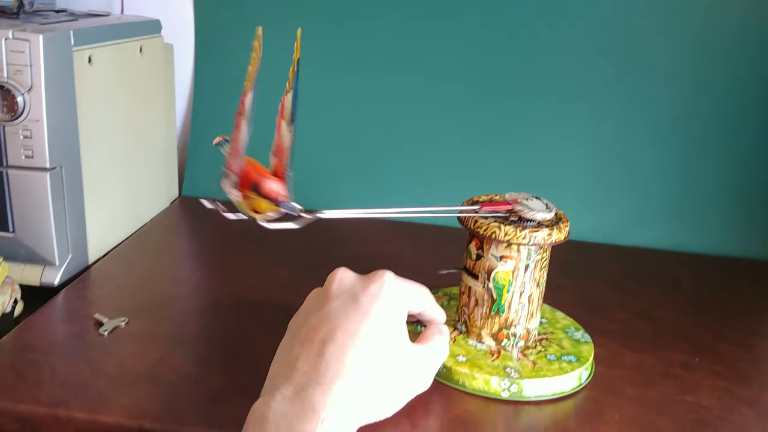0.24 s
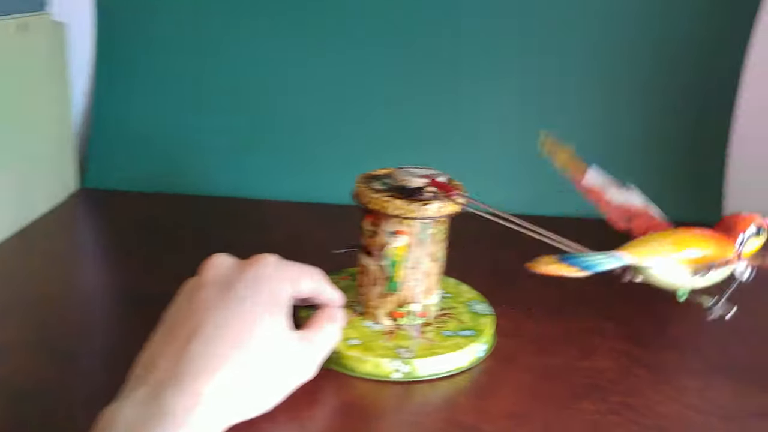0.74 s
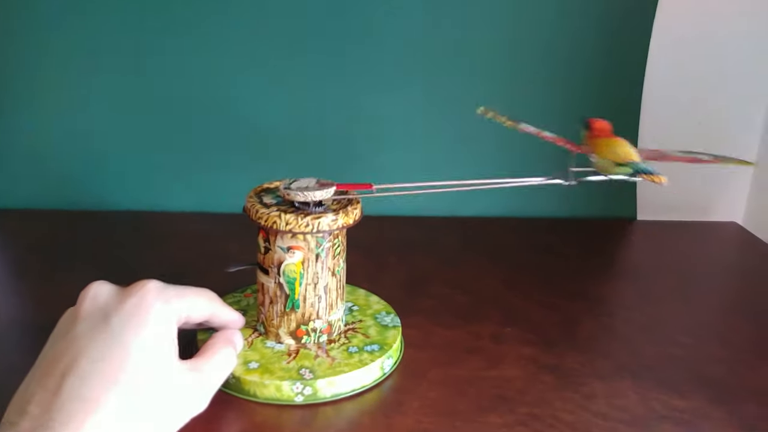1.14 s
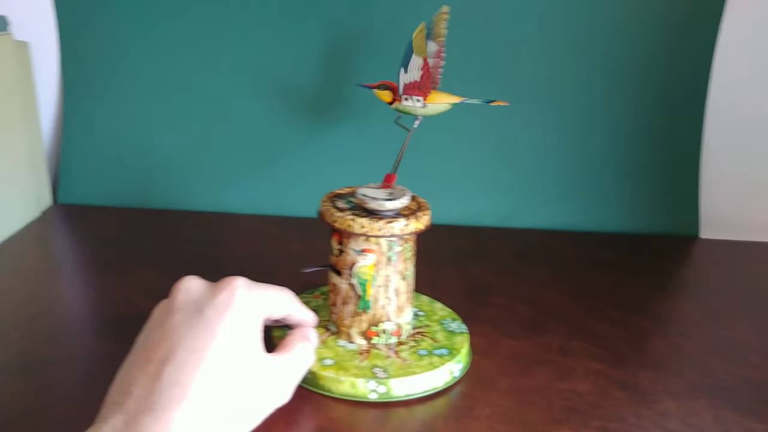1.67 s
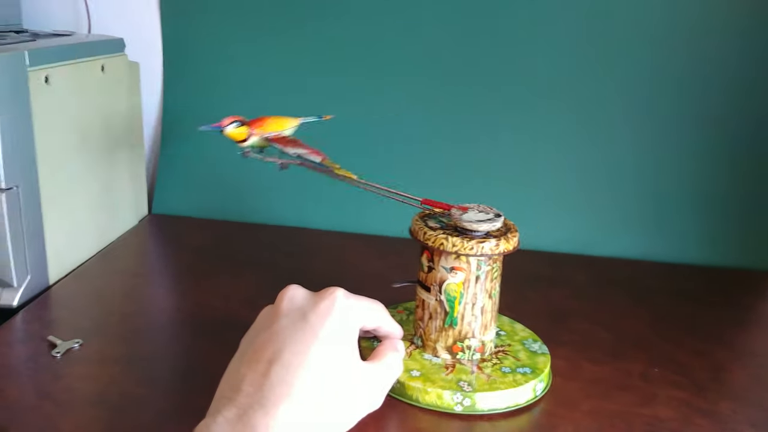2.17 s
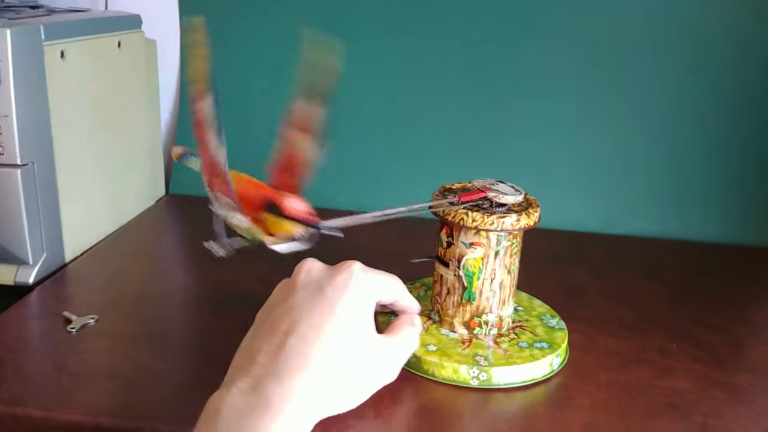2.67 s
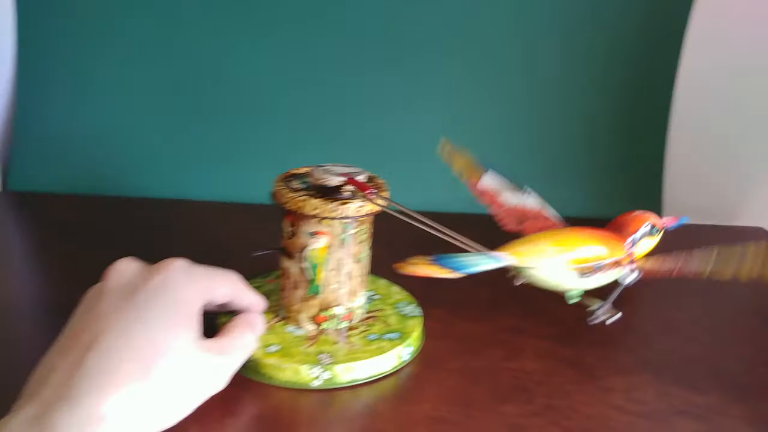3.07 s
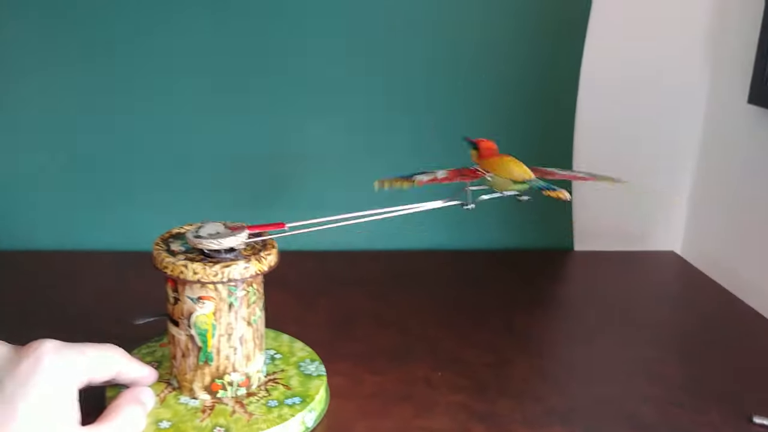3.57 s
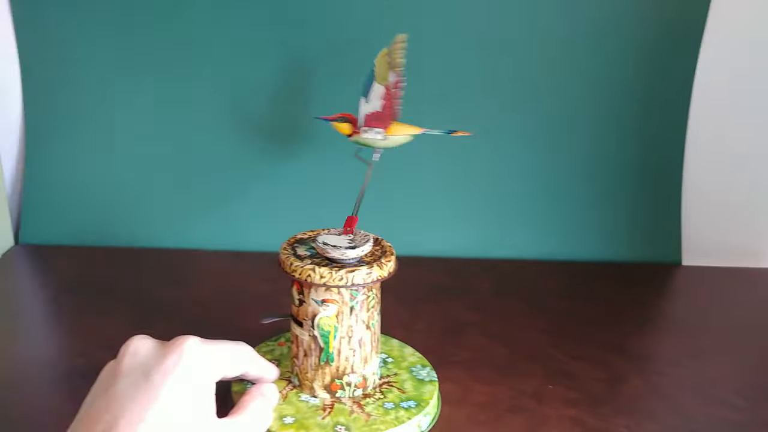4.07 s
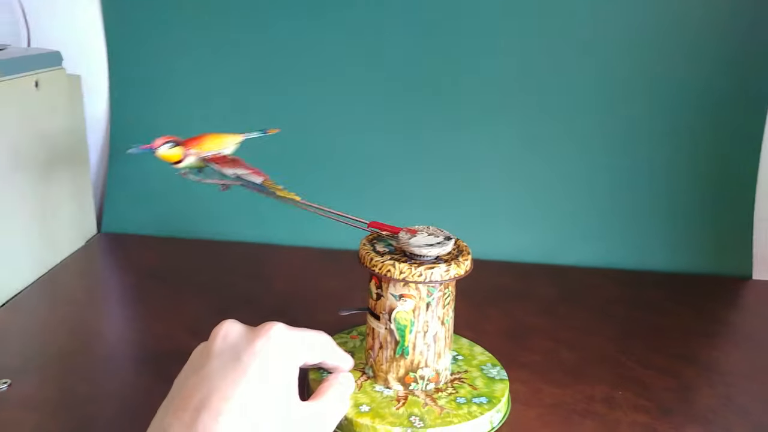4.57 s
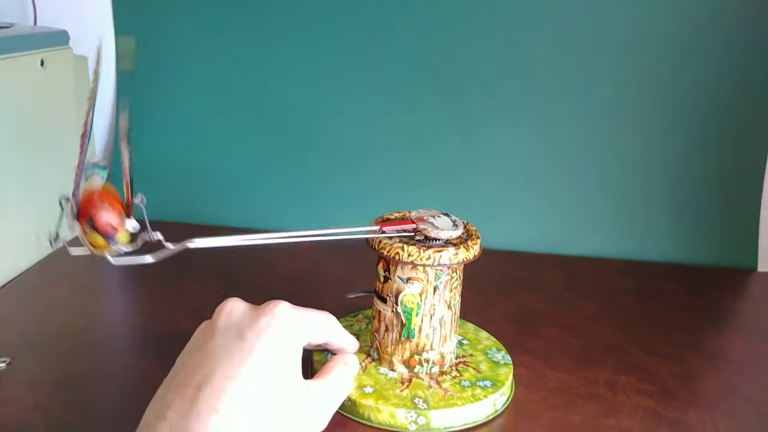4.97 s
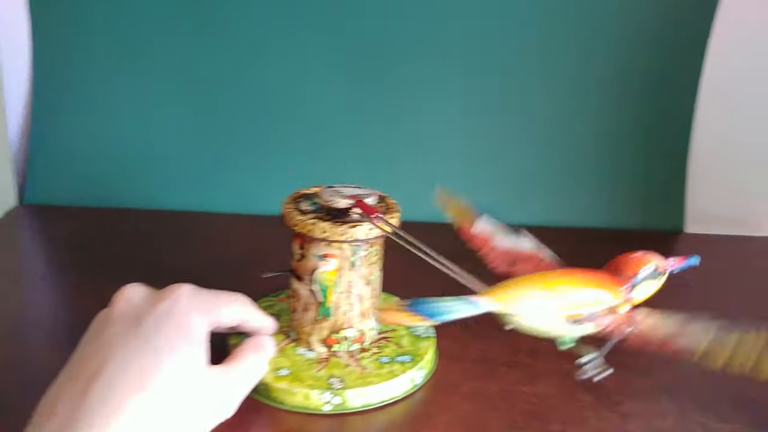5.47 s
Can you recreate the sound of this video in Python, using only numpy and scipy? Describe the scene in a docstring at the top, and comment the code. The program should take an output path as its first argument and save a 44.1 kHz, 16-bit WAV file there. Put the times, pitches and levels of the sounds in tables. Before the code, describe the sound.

High, tinny ticking runs without a break as a wind-up toy bird turns on its arm, heard up close in stereo on an indoor table. The rattle swells and dips rapidly, its colour changing with each circle. Hard little snaps, dull wing knocks and occasional wavering squeaks come through it. Beneath lie faint room hum and a soft drone that falls as the spring runs down.

```python
"""On a wooden table, close to a stereo camera, a clockwork tin bird circles its post on a long arm.
Its gears rattle in dense ticks that swell with every turn of an off-centre wheel. The ticks and the
knocks of the wings make the tin ring, and its tone shifts as the arm swings round. Now and then the
post sings a thin note. A soft drone, sinking as the spring runs down, and the room lie beneath."""
import sys
import numpy as np
from scipy import signal
from scipy.fft import rfft, irfft
from scipy.io import wavfile
from scipy.ndimage import uniform_filter1d

SR = 44100
rng = np.random.default_rng(int(sys.argv[2]) if len(sys.argv) > 2 else 0)


def generate_wav(sig):
    """Save sig (samples, or channels by samples) to the path in sys.argv[1] as 16-bit PCM at SR."""
    pcm = np.round(np.clip(np.atleast_2d(sig).T, -1, 1) * 32767).astype(np.int16)
    wavfile.write(sys.argv[1], SR, pcm)


N = 252693

# the pitches at which the tin rings: f/Hz, width/Hz, boost/dB
TIN_RINGS = [(583, 16.3, 8), (705, 61, 6.5), (791, 24, 3.5), (862, 123, 6.5), (959.5, 8.6, 10.5),
             (1177, 147, 6.5), (1335, 61, 10.5), (1537, 18, 9), (1945, 24, 5.5), (2010, 110, 0),
             (2176, 50, 7), (2375, 27, 9.5), (2454, 270, 3), (2684, 61, 5.5), (2770, 104, 3), (2935, 53, 2),
             (3047, 67, -5.5), (3293, 40, 3), (3630, 19, 4.5), (4720, 180, 4), (5240, 75, 5.5),
             (6400, 270, 4), (6900, 170, 3.5), (7450, 360, 5), (7930, 176, 4.5), (8990, 330, 5),
             (9440, 460, 8.5)]
# how far the camera body makes the right microphone lag: f/Hz, phase/rad
RIGHT_LAG = [(1500, .01), (3000, -0.052), (5000, -0.57), (6500, -0.56), (7500, -0.72), (10000, 0.47),
             (15000, 1.2)]


def amp(db):
    """Turns decibels into a factor to multiply by."""
    return 10 ** (np.asarray(db) / 20)


def unit_rms(x):
    """Scales a signal to an average strength (rms) of 1."""
    return x / np.sqrt(np.mean(x ** 2) + 1e-20)


def at_pitch(table, hz, column=1):
    """Looks up a table at any frequency, on a logarithmic scale."""
    columns = np.transpose(table)
    return np.interp(np.log(hz + 1), np.log(columns[0] + 1), columns[column])


def at_time(table, t):
    """Looks up a table at times t: one curve for each column after the first."""
    times, *columns = np.transpose(table)
    return [np.interp(t, times, column) for column in columns]


def bumps(centres, lengths, t):
    """Smooth bumps of height 1, one a row; each length is the width at half height."""
    centres, lengths = np.reshape([centres, lengths], (2, -1, 1))
    return np.exp(-4 * np.log(2) * ((t - centres) / np.maximum(lengths, 0.004)) ** 2)


def smooth(x, size):
    """Averages neighbouring values twice, leaving only the slower changes."""
    return uniform_filter1d(uniform_filter1d(x, size), size)


def fuzzy_tone(hz, width_hz):
    """Noise narrowed to a band around one pitch, which may glide."""
    spin = np.exp(2j * np.pi * np.cumsum(hz * np.ones(N)) / SR)
    decay = np.exp(-np.pi * width_hz / SR)
    slow_noise = signal.lfilter([1 - decay], [1, -decay], rng.standard_normal(N) / spin)
    return unit_rms((spin * slow_noise).real)


def stereo(a, b, hz, delay_s=0, pan_db=0):
    """Mixes two unrelated spectra into left and right: partly alike, unequal in level and timing."""
    # how alike the two sides are: f/Hz, likeness/0-1
    likeness = [(60, 0.8), (250, 0.82), (700, 0.62), (1300, 0.6), (2500, 0.35), (4500, .4), (7300, 0.5),
                (9000, 0.4), (13000, 0.26)]
    # how much louder the left side is: f/Hz, left minus right/dB
    balance = [(60, 6), (92, 7), (140, 2), (210, 6), (330, 1.5), (500, 4.5), (770, 4.5), (1170, 2),
               (1790, -0.5), (2740, 2.0), (4190, 5), (6410, 2), (9000, 4), (15000, 1)]
    alike = np.clip(at_pitch(likeness, hz), 0, 1)
    lean = amp((at_pitch(balance, hz) + pan_db) / 2)
    lag = np.exp(-1j * (2 * np.pi * hz * delay_s + at_pitch(RIGHT_LAG, hz)))
    right = alike * a + np.sqrt(1 - alike ** 2) * b
    return np.array([a * lean, right * lag / lean])


def tooth_pressure():
    """How hard the gear teeth meet: the off-centre wheel presses them together once a turn."""
    # the wheel at every third turn: t/s, mean pressure/dB, swell/dB
    wheel = [(-.037, -29.5, -2), (0.191, -30, 5), (.37, -23, 0), (0.537, -25, 2.5), (.715, -26.5, 2.5),
             (0.961, -28, 1.5), (1.168, -25.5, 3), (1.404, -28.5, 1.5), (1.629, -32.5, 3.5),
             (1.834, -29, .3), (2.082, -31, 6), (2.282, -29, 1.6), (2.527, -27, 2), (2.69, -25, 2),
             (2.868, -26, 3.5), (3.062, -27.5, 4), (3.295, -26.5, 5.5), (3.522, -26, 0.6), (3.76, -30, 3),
             (4.008, -33.5, 3), (4.2, -27, -1), (4.475, -27.5, 5.5), (4.684, -26.5, 1), (4.921, -28.5, 3.5),
             (5.117, -26, -1), (5.355, -25, 3.5), (5.543, -24.5, 0.1), (5.723, -30.5, 6.5)]
    # the teeth catch and the rattle flares: t/s, rise/dB, length/ms
    catches = [(1.282, 7.5, 19.3), (1.357, 3, 8), (1.726, 2.5, 35), (1.797, 2, 19), (2.185, 8.5, 33),
               (2.913, 5, 8.7), (3.178, 8, 25), (3.412, 5.5, 42), (3.637, 6, 21), (3.707, 7, 12),
               (4.041, 7.5, 13), (4.545, 3.5, 8.4), (4.61, 2.5, 36), (4.975, 3, 12), (5.045, 4, 48),
               (5.642, 4, 8.6)]
    # the rattle dips briefly: t/s, fall/dB, length/ms
    lulls = [(0.289, 19, 10), (1.212, 2, 76), (1.442, 6.5, 21), (1.512, 5, 72), (1.766, 12, 13),
             (2.345, 7, 48), (2.48, 5, 16), (2.56, 6, 20), (3.098, 17, 11), (3.143, 15, 10),
             (3.337, 4.5, 17), (3.557, 5, 43), (3.871, 8, 19), (3.98, 7, 20), (4.734, 8.5, 46),
             (4.95, 2, 23), (5.173, 0.5, 18), (5.24, 3.5, 14), (5.517, 9, 33)]
    t = np.arange(0, N, 20) / SR
    mean_db, swell_db = at_time(wheel, t)
    turns = np.interp(t, np.transpose(wheel)[0], 3 * np.arange(len(wheel)))
    db = mean_db + swell_db * np.cos(2 * np.pi * turns)
    for rows, sign in (catches, 1), (lulls, -1):
        when, change_db, ms = np.transpose(rows)
        db += sign * change_db @ bumps(when, ms / 1000, t)
    return amp(np.interp(np.arange(N) / SR, t, db))


def gear_ticks(pressure, ticks_per_s=5000, spots=24, fade_s=0.025):
    """Teeth tick at random spots of the tin, each with its own quick echoes; two unrelated sets."""
    sizes = amp(2.2 * np.minimum(rng.exponential(1, N), 3))
    ticks = unit_rms(sizes * (rng.random(N) < ticks_per_s / SR)) * pressure
    spot, t = rng.integers(0, spots, N), np.arange(1500) / SR
    echoes = rng.standard_normal((2, spots, len(t))) * amp(-60 * t / fade_s)
    echoes /= np.linalg.norm(echoes, axis=2, keepdims=True)
    return sum(signal.oaconvolve((ticks * (spot == k))[None], echoes[:, k])[:, :N] for k in range(spots))


def bearing_rub(pressure):
    """The bearings rub with an even hiss that follows only slow changes of the load."""
    return rng.standard_normal((2, N)) * uniform_filter1d(pressure, size=9000)


def tin_response(shifts, grain, detune=0.002, vary_db=1.2):
    """The rings of the tin, bent into one shape, laid over the overall tone that is heard."""
    # the tone of the ticking as recorded, with an empty gap near 10.7 kHz: f/Hz, level/dB
    heard_tone = [(240, -60), (400, -23), (527, -27.5), (717, -23), (1040, -25), (1670, -26.5), (2000, -20),
                  (2150, -15.5), (3050, -16), (4400, -17), (7290, -0.5), (8240, -7), (9600, -30.5),
                  (10700, -55), (12700, -17), (15700, -18.5)]
    hz = np.fft.rfftfreq(8192, 1 / SR)
    db = at_pitch(heard_tone, hz)
    for (ring_hz, width_hz, boost_db), (pitch_shift, level_shift) in zip(TIN_RINGS, shifts):
        off_hz = hz - ring_hz * (1 + detune * pitch_shift)
        db += (boost_db + vary_db * level_shift) / (1 + (2 * off_hz / width_hz) ** 2)
    # countless thin rings of the sheet in the treble
    db += 3.6 * np.clip(unit_rms(smooth(grain, 4)) - 0.5, 0, 2) * (hz > 2900)
    # turn the levels into a sound that starts at once and dies away (minimum phase)
    log_gain = np.log(amp(np.maximum(db, -100)))
    mirrored = np.concatenate([log_gain, log_gain[-2:0:-1]])
    response = np.fft.ifft(np.exp(np.conj(signal.hilbert(mirrored)))).real[:len(hz)]
    return response / np.linalg.norm(response)


def flexing_tin(drive, shapes=6, step_s=0.13):
    """The shaken tin flexes from one shape to another, each ringing a little differently."""
    shifts = rng.standard_normal((shapes, len(TIN_RINGS), 2))
    shifts -= shifts.mean(axis=0)
    grain = rng.standard_normal((shapes, 4097))
    steps = np.arange(0, N / SR + 1, step_s)
    shape = rng.integers(0, shapes, size=200)[:len(steps)]
    ringing = np.zeros_like(drive)
    for k in range(shapes):
        share = np.sqrt(np.interp(np.arange(N) / SR, steps, shape == k))
        response = tin_response(shifts[k], grain[k])
        ringing += signal.oaconvolve(drive * share, response[None, None])[..., :N]
    return ringing


def shifting_tone(hz, t, angle, pressure, flicker_db=1.1, patch_db=1.2):
    """How the toy's tone and its left-right balance change as the arm goes round, both in dB."""
    # tone by the bird's position: f/Hz, in front/dB, on the right/dB
    facing = [(615, -0.5, -2), (700, -0.5, 3.5), (860, -1, 2), (940, 0.5, -0.5), (1310, 0.5, 3),
              (1300, -3.5, -2.5), (1590, -0.5, -2.5), (1750, 1, -0.5), (2330, -1.5, 1.5), (2210, 3.5, -5.5),
              (2506, -4.5, 5.5), (2836, 2.5, -4.5), (2860, 0.2, 9), (3060, 2, -1), (4050, 1, 0.5),
              (4520, -1.5, -0.5), (5860, -1.2, -2.5), (6400, -2, -1), (6850, -0.3, -1), (7500, -1.5, -1),
              (8300, 0, 0.35), (12000, 0.5, 4.5), (15000, 0.6, 2.5)]
    # t/s, rasp of the post wall/dB, top fizz/dB, lower edge of the whirr/dB, base/dB, left minus right/dB
    bands = [(0, 4, -3, 1, 0.5, -1.5), (.45, 4, -5.5, -1, -0.5, 0), (.7, -2.5, -8.5, 4, -1, 0),
             (1.05, -4, -9, 4, 2, 0.5), (1.4, -6.5, -3.5, 3.5, 1.5, 0.5), (1.75, 0.5, -6.5, -0.5, -2.5, -1),
             (2.2, 2, -1.5, -5.5, 1, -1), (2.75, 3, -2, -1, 0.5, -0.5), (3.2, -3.5, -7, 2.5, 1.5, 1),
             (3.5, -2.5, -6.5, 6, 1.5, 2), (3.8, -6.5, -3, 2.5, 1.5, 1), (4.1, -4.5, -8, 3.5, -1, 0),
             (4.45, 0.5, -5.5, -2.5, -1, -1), (4.8, 0, -0.5, -1.5, 1.5, -2), (5.15, 5, -2, -0.5, 2, -1),
             (5.73, -7, -8, 0.5, -1, 1)]
    # three more parts of the whirr: t/s, middle/dB, sheen/dB, upper edge/dB
    whirr = [(0, -2, 3.5, 4), (.45, -2, -1.5, 1), (.9, -2, 3.5, 1.5), (1.4, 3, -0.5, -1),
             (1.9, -0.5, -2, 1), (2.3, -1, -1, 0.5), (2.75, 0, -1.5, 3), (3.2, -3.5, 0, 2),
             (3.6, 3.5, 5, -2), (3.9, -1, 3, 1), (4.3, -0.5, -2, -2), (4.7, -2, -4, 0), (5.15, 0, -1.5, -2),
             (5.73, -4, 0, -1)]
    # short scrapes on the wall of the post: t/s, rise/dB, length/s
    scrapes = [(0.49, 5.5, 0.066), (2.014, 7, 0.04), (2.645, 8, 0.027), (2.808, 10, 0.031),
               (4.595, 6, 0.029), (4.84, 5.5, 0.072)]
    db = at_pitch(facing, hz) * np.cos(angle) + at_pitch(facing, hz, column=2) * np.sin(angle)
    rasp_db, fizz_db, edge_db, base_db, pan_db = at_time(bands, t)
    flicker = uniform_filter1d(rng.standard_normal((len(t), 2)), size=8, axis=0).T
    rasp_db, fizz_db = np.array([rasp_db, fizz_db]) + flicker_db * unit_rms(flicker)
    when, rise_db, length = np.transpose(scrapes)
    rasp_db += rise_db @ bumps(when, length, t)
    db += np.exp(-((hz - 2450) / 300) ** 4) * rasp_db + (hz > 10700) * fizz_db
    # a harder push shakes the low drum of the base most
    push_db = 20 * np.log10(np.interp(t * SR, np.arange(N), unit_rms(pressure)))
    db += (hz < 1700) * (0.07 * push_db + base_db)
    whirr_db = [edge_db, *at_time(whirr, t)]
    for band_db, centre_hz, width_hz in zip(whirr_db, (6000, 3250, 4800, 8000), (1100, 450, 350, 500)):
        db += np.exp(-((hz - centre_hz) / width_hz) ** 2) * band_db
    # echoes off table and wall shift as the bird moves: drifting patches of tone
    patches = uniform_filter1d(rng.standard_normal(db.shape), size=3, axis=0)
    patches = uniform_filter1d(patches, size=24, axis=1)
    return db + patch_db * unit_rms(patches), pan_db


def circling_bird(gain_db=-1.5):
    """Ticks, snaps, knocks and rubbing ring the tin while the arm carries the bird round."""
    # the arm's travel, whole numbers when the bird is nearest: t/s, angle/turns
    arm = [(0, -0.3), (.55, 0), (2.92, 1.0), (5.38, 2.0), (5.73, 2.5)]
    # the rubbing compared with the ticks: f/Hz, level/dB
    rub_tone = [(500, -5), (900, -8), (1300, -8.5), (2400, -8), (3700, -1.5), (5000, -1), (7300, -16),
                (13000, -19)]
    # change of balance with the bird on the right: f/Hz, left minus right/dB
    sway = [(2000, -1.3), (6000, -1.4), (8000, 0), (15000, -0.5)]
    pressure = tooth_pressure()
    hits = gear_ticks(pressure) + hard_snaps() + wing_knocks()
    ringing = flexing_tin(np.array([hits, bearing_rub(pressure)]))
    # cut the sound into short slices, so that each can have its own tone
    hz, t, (rattle, rub) = signal.stft(ringing, SR, nperseg=1024, noverlap=768)
    hz, angle = hz[:, None], 2 * np.pi * at_time(arm, t)[0]
    tone_db, pan_db = shifting_tone(hz, t, angle, pressure)
    spectra = (rattle + rub * amp(at_pitch(rub_tone, hz))) * amp(gain_db + tone_db)
    reach = 0.53  # arm length divided by the distance to the post
    aside = angle - 0.31  # the bird passes straight ahead a little after it is nearest
    direction = np.arctan2(reach * np.sin(aside), 1 - reach * np.cos(aside))
    delay_ms = 0.011 + 0.14 * np.sin(direction) + 0.012 * t  # drifts as the camera slowly turns
    pair = stereo(*spectra, hz, delay_ms / 1000, at_pitch(sway, hz) * np.sin(angle) + pan_db)
    return signal.istft(pair, SR, nperseg=1024, noverlap=768)[1][:, :N]


def table_drone(rest_db=-66.5, flutter_db=1.8):
    """A low, fuzzy, fluttering tone carried through the table."""
    # the pitch starts high and sinks as the spring runs down: t/s, f/Hz
    pitch = [(0, 380), (.17, 380), (.32, 369), (.52, 366), (.76, 377.7), (.9, 313), (1.15, 314),
             (1.35, 328), (1.5, 332.5), (2.2, 320.6), (3.1, 300), (3.55, 298), (4.35, 292), (5.73, 277.4)]
    # the drone swells and fades: t/s, level/dB, length/s
    swells = [(0.155, -54, 0.11), (0.347, -49.5, 0.063), (0.524, -52, 0.083), (.68, -55.5, 0.1),
              (1.063, -51.5, 0.11), (1.308, -55.5, 0.61), (2.786, -60, 0.26), (3.14, -50, 0.13),
              (3.344, -55, 0.2), (3.554, -50, 0.14), (4.2, -57.5, 0.13), (4.36, -57, 0.1),
              (4.837, -56, 0.1), (5.38, -56.5, 0.19)]
    t = np.arange(N) / SR
    hz = at_time(pitch, t)[0]
    when, db, length = np.transpose(swells)
    level = amp(rest_db) + amp(db) @ bumps(when, length, t)
    level *= amp(flutter_db * unit_rms(smooth(rng.standard_normal(N), 1500)) - 1)
    tone = 1.04 * np.sin(2 * np.pi * np.cumsum(hz) / SR) + 0.45 * fuzzy_tone(hz, width_hz=23)
    # the octave above comes up as the spring runs down
    octave = amp(rest_db - 31.5 + 6 * t) * fuzzy_tone(2 * hz, width_hz=2.1)
    return level * unit_rms(tone) + octave


def room_hum():
    """Faint hums of the room; the lowest one swells once."""
    # the steady hums: f/Hz, width/Hz, level/dB
    hums = [(96, 8, -80), (130, 9.5, -65.5), (251.8, 5.5, -70.5)]
    steady = sum(amp(db) * fuzzy_tone(hz, width_hz) for hz, width_hz, db in hums)
    swell = 1 + 2.3 * bumps(1.05, 0.69, np.arange(N) / SR)[0]
    return steady + amp(-68.5) * swell * fuzzy_tone(70, width_hz=8.1)


def room_murmur():
    """The low noise of the room, slowly rising and falling."""
    # the tone of the murmur: f/Hz, level/dB
    tone = [(18, -57), (30, -26), (62, -2.5), (123, 1.5), (150, 3), (195, -6.5), (247, 0.5), (293, 0),
            (471, -7), (524, -18), (630, -11), (700, -10), (910, -20), (1540, -120)]
    # its loudness: t/s, level/dB
    loudness = [(0, -57.5), (.6, -54.5), (1.05, -54.5), (1.5, -55.5), (2.5, -56), (3.2, -54), (3.8, -56),
                (4.5, -54), (5.1, -53.5), (5.73, -56.5)]
    hz = np.fft.rfftfreq(N, 1 / SR)
    noise = stereo(*rfft(rng.standard_normal((2, N))), hz)
    murmur = irfft(noise * amp(at_pitch(tone, hz)), N)
    return amp(at_time(loudness, np.arange(N) / SR)[0]) * unit_rms(murmur)


def hard_snaps(gain_db=-8, ring_hz=7100, fade_s=0.0045):
    """Single hard ticks, each with a short, high ring."""
    # when and how hard they strike the tin: t/s, strength/dB
    snaps = [(.1112, -19), (.239, -19), (.3094, -18), (.4096, -15), (.4754, -15), (.5351, -13),
             (.7192, -15), (1.0251, -18), (1.2656, -16), (1.4099, -17), (1.6713, -17), (1.6791, -19),
             (1.7209, -16), (1.7943, -15), (1.9931, -16), (2.0763, -12), (2.0831, -15), (2.1407, -15),
             (2.3877, -18), (2.6396, -15), (2.8677, -14), (2.912, -14), (3.2271, -14), (3.2858, -13),
             (3.3763, -13), (3.4308, -13), (3.4429, -12), (3.6034, -14), (3.7708, -16), (4.2731, -16),
             (4.4726, -12), (4.5475, -12), (4.621, -12), (4.6421, -13), (4.9123, -15), (4.9643, -14),
             (5.0597, -12), (5.1257, -13), (5.1468, -14), (5.217, -14), (5.2783, -12), (5.5426, -17),
             (5.6521, -15)]
    when, db = np.transpose(snaps)
    clicks = np.bincount(np.round(when * SR).astype(int), amp(db), N)[:N]
    t = np.arange(600) / SR
    ping = amp(gain_db - 60 * t / fade_s) * np.sin(2 * np.pi * ring_hz * t)
    return signal.oaconvolve(clicks, ping)[:N]


def singing_post(wobble_hz=17, wobbles_per_s=11):
    """Jolted by the wheel, the post sings thin, slightly wavering notes."""
    # the notes, each at its loudest moment: t/s, level/dB, length/s, f/Hz
    notes = [(0.25, -50, 0.067, 2330), (0.313, -43, 0.036, 2394), (0.363, -47, 0.027, 2370),
             (0.483, -40, 0.033, 2340), (.52, -46, 0.036, 2340), (0.53, -57, 0.027, 1343),
             (1.027, -52, .035, 1370), (1.704, -55, .17, 2330), (2.086, -51.5, .06, 1330),
             (2.2, -56, .2, 2340), (2.59, -46, 0.025, 3705), (2.7, -49, .08, 2337),
             (2.75, -49, 0.033, 1339), (2.775, -49, 0.071, 3750), (2.794, -46, .06, 2363),
             (3.7, -46, 0.33, 4850), (4.15, -53, 0.27, 4930), (4.19, -51, .23, 2307),
             (4.595, -44, .05, 2660), (4.624, -52, .06, 2350), (4.84, -44.5, .04, 2352),
             (5.05, -43, 0.034, 2350), (5.12, -48, 0.084, 2335), (5.195, -39.5, .05, 3705),
             (5.2, -41, .045, 2340), (5.209, -45, 0.041, 2740), (5.282, -45, 0.033, 2350),
             (5.397, -47, .08, 2935)]
    t, out = np.arange(N) / SR, np.zeros((2, N))
    for when, db, length, hz in notes:
        tone_start, wobble_start = rng.random(2)
        span = slice(max(round((when - 2 * length) * SR), 0), round((when + 2 * length) * SR))
        wobble = wobble_hz * np.sin(2 * np.pi * (wobbles_per_s * t[span] + wobble_start))
        phase = 2 * np.pi * (hz * t[span] + np.cumsum(wobble) / SR + tone_start)
        tone = np.sqrt(2) * np.sin([phase, phase - at_pitch(RIGHT_LAG, hz)])
        out[:, span] += amp(db) * bumps(when, length, t[span]) * tone
    return out * amp([[1.5], [-1.5]])  # louder on the left


def wing_knocks(rise_s=0.007, fade_s=0.098):
    """The wing linkage bumps the frame: blunt, rough thuds that rise softly and die quickly."""
    # the bumps on the frame: t/s, strength/dB, f/Hz
    knocks = [(0.532, -34, 920), (0.803, -43, 910), (1.023, -31, 1280), (1.16, -33, 752), (1.26, -45, 760),
              (1.34, -40, 678), (1.464, -37, 690), (1.55, -39.5, 700), (3.285, -33, 715),
              (3.288, -43.5, 828), (3.364, -40, 757), (3.436, -32, 1180), (3.45, -38, 760),
              (3.515, -41, 824), (3.65, -40, 860), (5.266, -35.5, 947), (5.414, -34, 900)]
    t, out = np.arange(3000) / SR, np.zeros((2, N))
    for when, db, hz in knocks:
        band = signal.butter(2, [hz * 0.82, hz * 1.58], "bandpass", fs=SR, output="sos")
        noise = signal.sosfilt(band, rng.standard_normal((2, len(t))))
        thud = 0.6 * np.sin(2 * np.pi * hz * t) + 0.82 * unit_rms(noise)
        level = amp(db + 9 - 60 * t / fade_s) * (1 - np.exp(-t / rise_s))
        start = round(when * SR)
        out[:, start:start + len(t)] += level * thud
    return out


def scene():
    """Everything that reaches the two microphones."""
    bird = circling_bird()
    low_tones = (table_drone() + room_hum()) * amp([[1.3], [-1.3]])  # louder on the left
    return bird + low_tones + room_murmur() + singing_post()


def record(dry):
    """The recorder cuts off the highest treble."""
    low_pass = signal.firwin(511, cutoff=15720, window=("kaiser", 9), fs=SR)
    return signal.oaconvolve(dry, low_pass[None], "same")


dry = scene()
out = record(dry)
generate_wav(out)
```